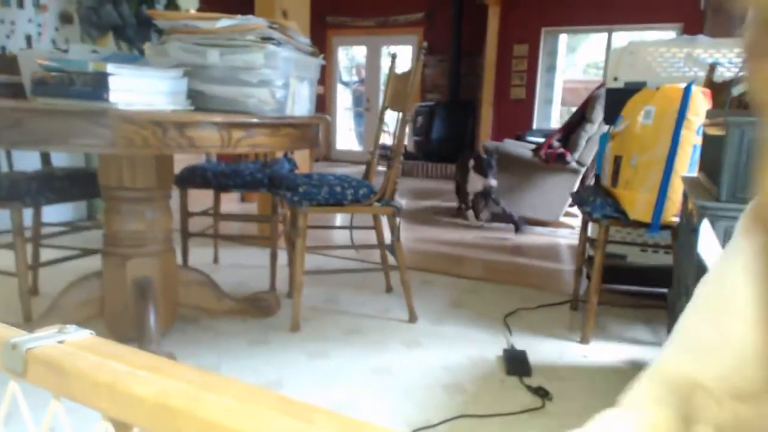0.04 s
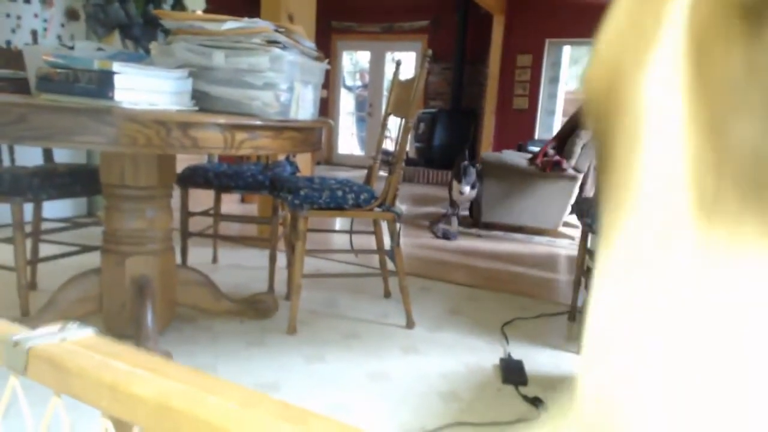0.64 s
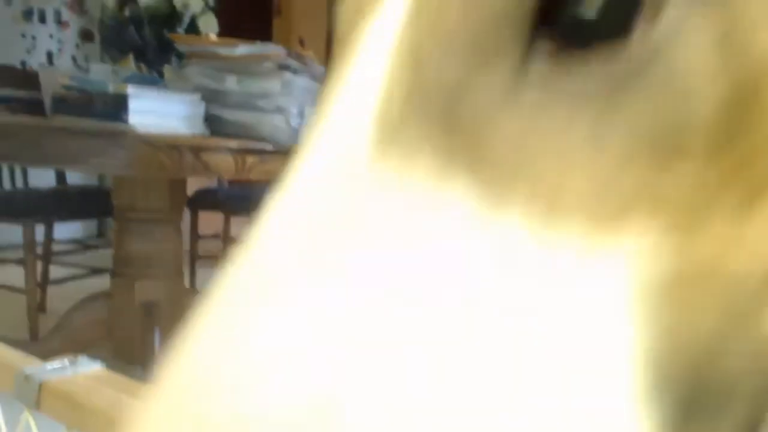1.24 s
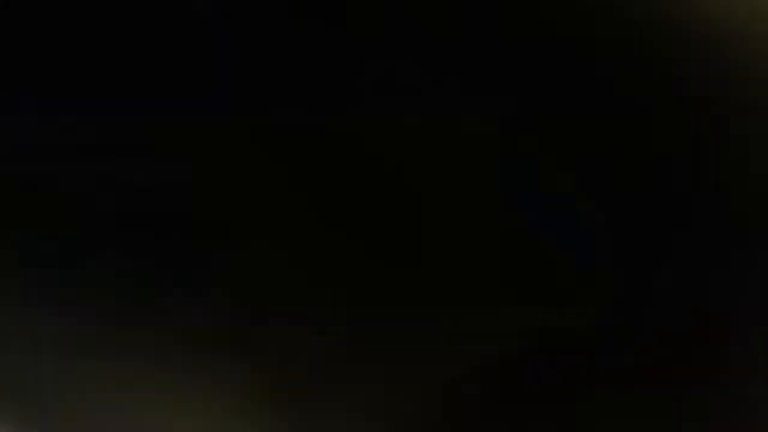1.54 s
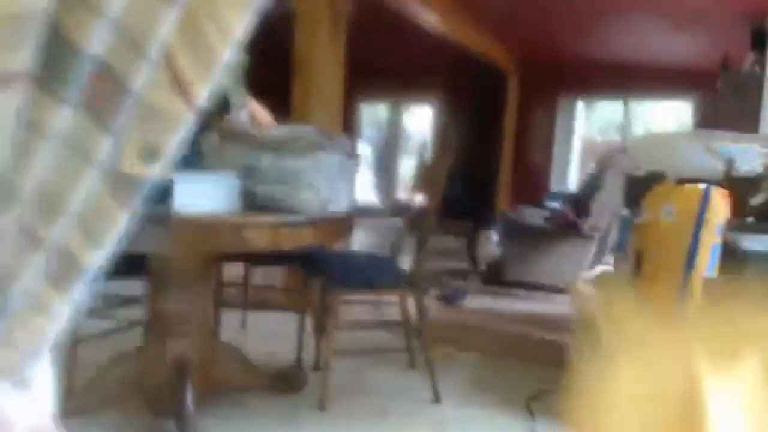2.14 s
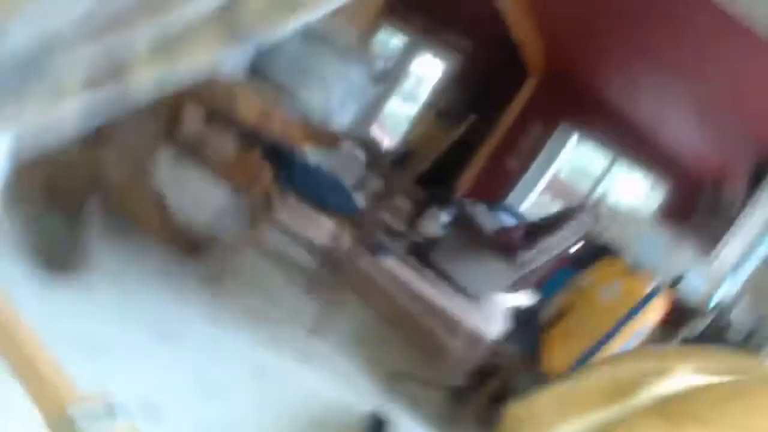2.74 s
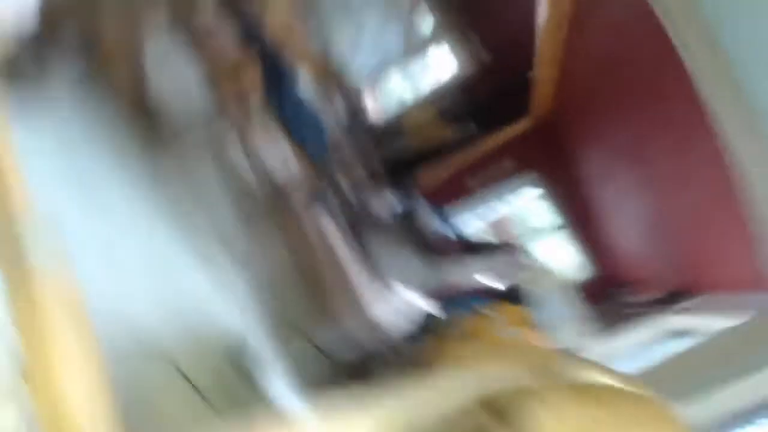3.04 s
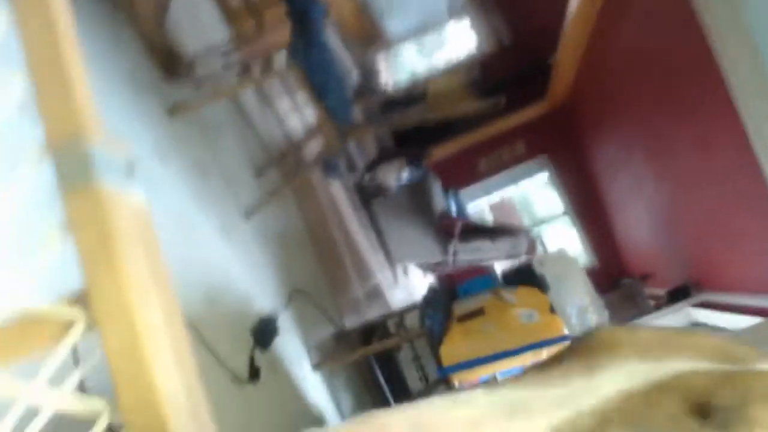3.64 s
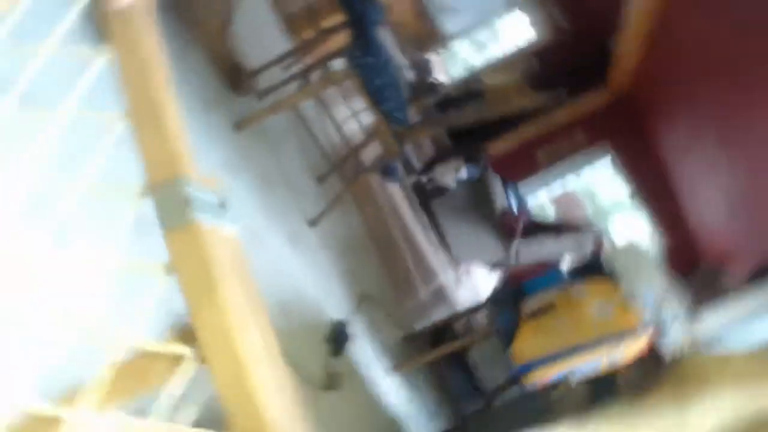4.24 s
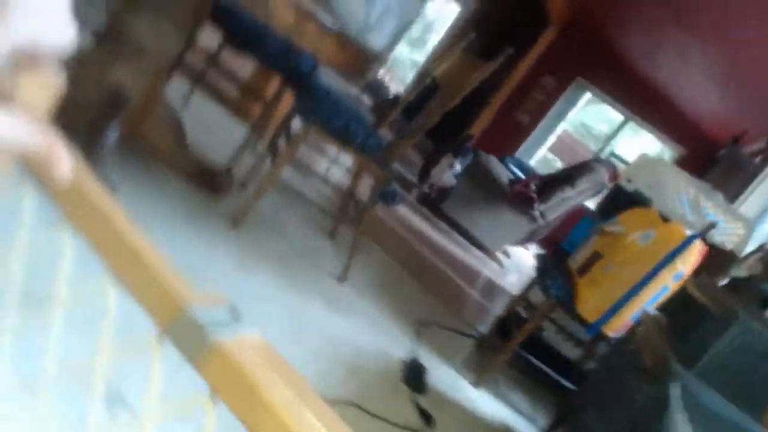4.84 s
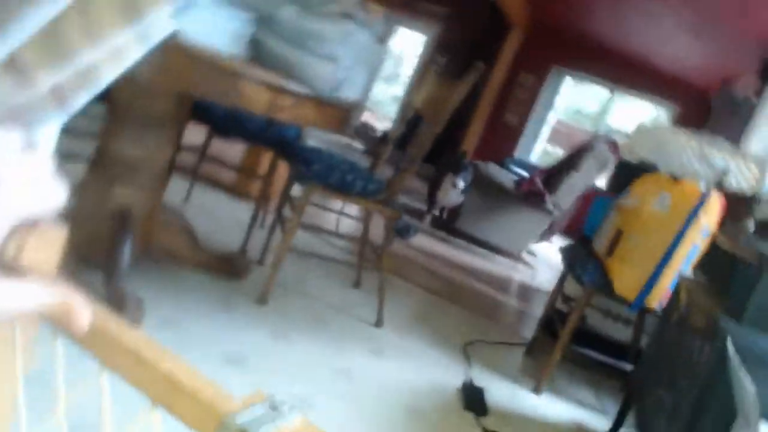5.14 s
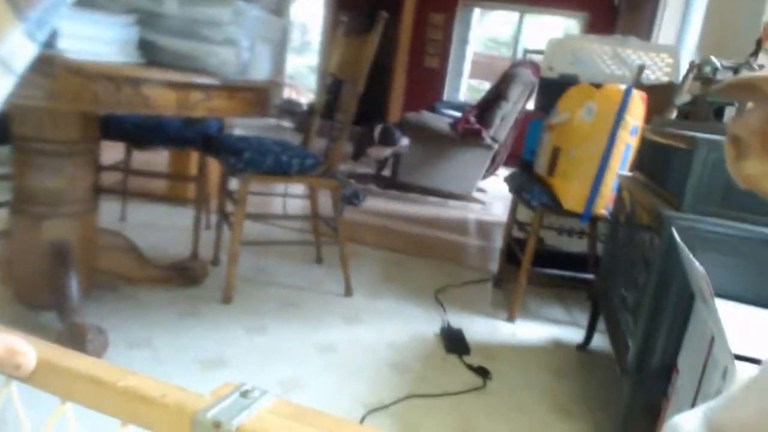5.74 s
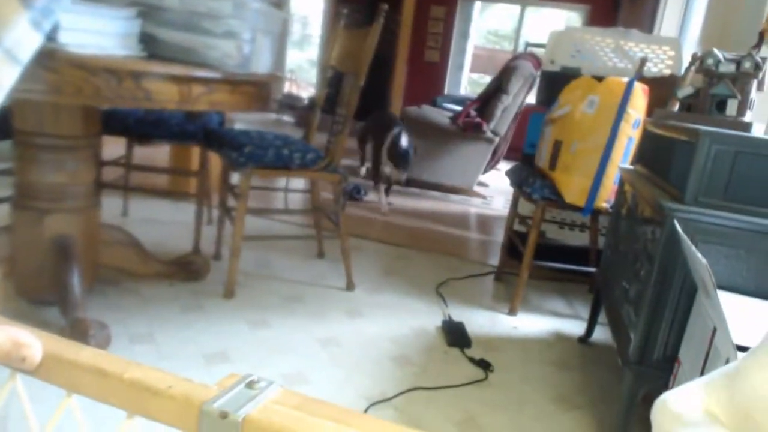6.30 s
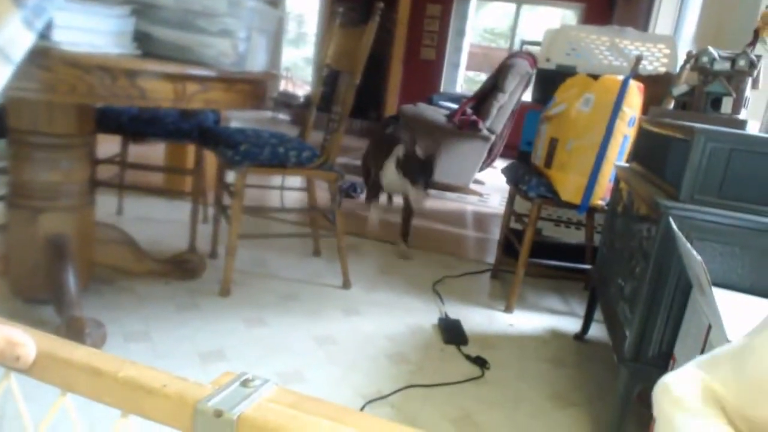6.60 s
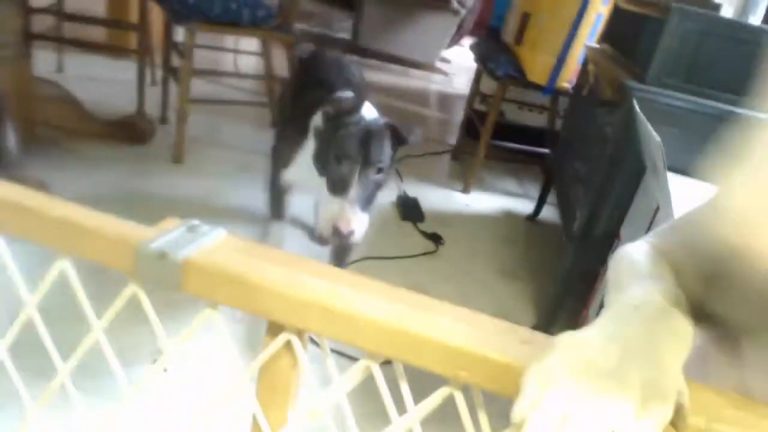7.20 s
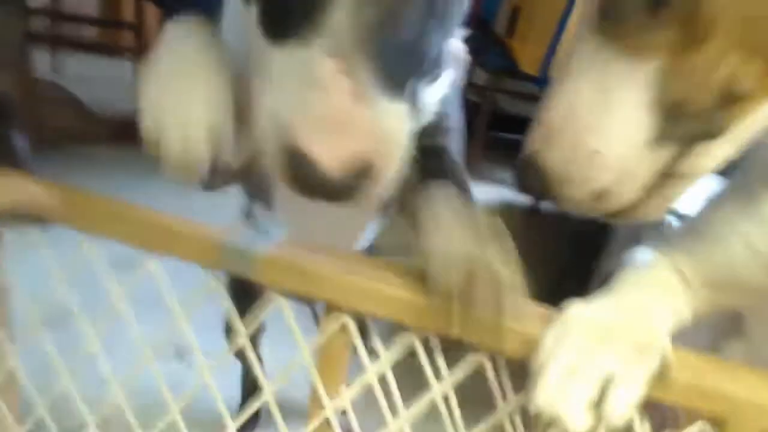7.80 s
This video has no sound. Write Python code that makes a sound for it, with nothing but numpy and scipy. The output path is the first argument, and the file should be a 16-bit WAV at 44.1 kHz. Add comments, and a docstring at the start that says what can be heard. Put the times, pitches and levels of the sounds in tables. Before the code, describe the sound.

Dogs' paws thud and claws click indoors, a muzzle rubs the microphone, and a wooden gate rattles over a steady hum.

```python
"""Dogs at a wooden pet gate in a living room: claws strike and ring the wood, paws thud and skid by
friction, and the gate rattles in its loose frame. One dog nuzzles the camera, exciting the resonances
of its shell, and the camera is then bumped and turned; another gallops up over the floor and skids to
the gate. An appliance hums throughout with mains harmonics and motor tones over a rush of air."""
import sys
import numpy as np
from scipy import signal
from scipy.fft import rfft, irfft, next_fast_len
from scipy.io import wavfile
from scipy.ndimage import uniform_filter1d, map_coordinates

SR = 44100
rng = np.random.default_rng(int(sys.argv[2]) if len(sys.argv) > 2 else 0)


def generate_wav(sig):
    """Save sig (samples, or channels by samples) to the path in sys.argv[1] as 16-bit PCM at SR."""
    pcm = np.round(np.clip(np.atleast_2d(sig).T, -1, 1) * 32767).astype(np.int16)
    wavfile.write(sys.argv[1], SR, pcm)


N = 346626
T = np.arange(SR * 3 // 4) / SR  # time axis of one short sound
STROKE_LEAD_S, SLIP_LEAD_S = T[len(T) // 3], T[len(T) // 10]  # where a stroke and a squeak peak on T


def amp(db):
    """Decibels to amplitude ratio."""
    return 10 ** (np.asarray(db) / 20)


def decay(t60):
    """Exponential damping: 60 dB down after t60 seconds."""
    return amp(-60 * T / t60)


def unit(x):
    """Normalisation to rms 1."""
    return x / np.sqrt(np.mean(x ** 2) + 1e-20)


def crest(x):
    """Normalisation of a stereo sound so that its loudest 5 ms have rms 1."""
    return x / np.sqrt(uniform_filter1d(np.mean(x ** 2, axis=0), size=220).max())


def along(points, hz):
    """Interpolation of (Hz, value) points on a logarithmic frequency axis."""
    knots, values = np.transpose(points)
    return np.interp(np.log(hz + 1), np.log(knots + 1), values)


def curve(rows):
    """Linear interpolation of (s, value) rows to one value per sample."""
    return np.interp(np.arange(N) / SR, *np.transpose(rows))


def wobble(rate):
    """Smooth random modulation with rate knots a second."""
    return map_coordinates(rng.standard_normal(int(N * rate / SR) + 4), [np.arange(N) * rate / SR])


def grit(depth, samples):
    """Log-normal amplitude modulation in grains about this many samples long."""
    return np.exp(depth * unit(uniform_filter1d(rng.standard_normal(len(T)), size=samples)))


def filtered(x, response):
    """Linear filtering: the spectrum of x times a complex frequency response."""
    n = x.shape[-1]
    size = next_fast_len(n + 2048, True)
    return irfft(rfft(x, size) * response(np.fft.rfftfreq(size, 1 / SR)), size)[..., :n]


def coloured(x, spectrum):
    """Spectral shaping by (Hz, dB) points."""
    return filtered(x, lambda hz: amp(along(spectrum, hz)))


def resonate(x, modes):
    """Modal superposition: x drives (Hz, width Hz, dB) resonances of alternating sign."""
    return filtered(x, lambda f: sum((-1) ** k * amp(db) * 1j * f * w / (hz * hz - f * f + 1j * f * w)
                                     for k, (hz, w, db) in enumerate(modes)))


def noise(size):
    """Spatial coherence: white noise at two microphones, alike in the bass, unrelated in the treble."""
    # Each row: frequency in Hz, side level over mid level in dB.
    width = [(60, -64.5), (150, -103), (350, -24), (600, -28.5), (1060, -7), (1900, 1), (6000, -0.5)]
    turn = lambda hz: np.arctan(amp(along(width, hz)))
    white = rng.standard_normal((2, size))
    mid, side = filtered(white, lambda hz: np.array([np.cos(turn(hz)), np.sin(turn(hz))]))
    return np.array([mid + side, mid - side])


def add(track, s, sound):
    """Superposition of a sound on the track from s seconds on."""
    start = round(s * SR)
    part = sound[:, max(-start, 0):N - start]
    track[:, max(start, 0):][:, :part.shape[1]] += part


def in_room(x, wet_db):
    """Reverberation: a short sound plus a tail in which each frequency dies at its own rate."""
    # Each row: frequency in Hz, reverberation time in seconds.
    room_t60 = [(100, 0.4), (500, 0.48), (2000, 0.46), (5000, 0.41), (10000, 0.36)]
    hz, t, spectra = signal.stft(noise(len(T)), SR, nperseg=256)
    damped = spectra * amp(-60 * t / along(room_t60, hz)[:, None])
    tail = signal.istft(damped, SR, nperseg=256)[1][:, :len(T)]
    reflections = grit(depth=0.45, samples=50)  # furniture and walls answer separately
    tail = tail * reflections * (1 - np.exp(-T / 0.00069))
    return x + amp(wet_db) * signal.fftconvolve(x, tail / np.linalg.norm(tail[0]), axes=1)[:, :len(T)]


def tone(hz, db, drift_rad):
    """A hum line with phase drift; shorter waves reach the two microphones more out of step."""
    apart = np.array([[1], [-1]]) * hz / 2200 * wobble(0.7)
    phase = 2 * np.pi * hz * np.arange(N) / SR + drift_rad * wobble(1.686) + apart
    return amp(db + wobble(0.57)) * np.sqrt(2) * np.sin(phase)


def appliance():
    """Mains harmonics form standing waves that the camera moves through; motor tones and air join in."""
    # Each row: time in seconds, rms levels of the first, second and third harmonic in dB.
    mains_levels = [(0, -38.5, -54, -54), (.7, -39, -44.5, -58), (2.6, -40.5, -50, -51),
                    (3.2, -41.5, -46.5, -54), (4.1, -40.5, -51, -48.5), (5.3, -40.5, -48.5, -48),
                    (7.86, -46, -71, -54.5)]
    # Each row: frequency of a motor tone in Hz, rms level in dB.
    motor_tones = [(203.9, -51.5), (320, -58), (489.9, -58.5), (666, -58)]
    # Each row: time in seconds, level of the rushing air in dB.
    air_levels = [(0, -35), (1.4, -40), (2.6, -38), (3.5, -40.5), (5.5, -40), (6.5, -38), (7.86, -36)]
    # Each row: frequency in Hz, gain of the rushing air in dB.
    air_spectrum = [(20, 4), (32, -25), (48, 2.5), (100, -4), (260, -2), (430, -6.5), (700, -8.5),
                    (1000, -11.5), (1400, -14), (1800, -21), (3200, -24.5), (5000, -31.5), (6500, -37.5),
                    (6900, -34), (7500, -45), (11000, -75)]
    hum_hz, levels = 120, np.array(mains_levels)
    mains = sum(tone(k * hum_hz, curve(levels[:, [0, k]]), drift_rad=0.2) for k in (1, 2, 3))
    motor = sum(tone(hz, db, drift_rad=1.0) for hz, db in motor_tones)
    air = amp(curve(air_levels) + 0.16 * wobble(2.9)) * unit(coloured(noise(N), air_spectrum))
    return mains + motor + air


def thud(hz, t60, knock_db, boom_db):
    """A soft impact excites one damped oscillation, the duller floor modes and a knock of contact."""
    # Each row: frequency in Hz, gain of the floor's boom in dB.
    boom_spectrum = [(25, -39), (60, -22), (90, 19.5), (190, 13.5), (300, 3.5), (600, -14), (1500, -81)]
    # Each row: frequency in Hz, gain of the knock in dB.
    knock_spectrum = [(100, -14), (300, 9.5), (700, 12.5), (1200, -2), (1800, -19), (4000, -5), (7000, -27),
                      (10000, -29)]
    envelope = decay(t60) * (1 - np.exp(-T / 0.0013))
    swing = np.cos(2 * np.pi * hz * T) * envelope
    boom = crest(coloured(noise(len(T)) * envelope, boom_spectrum))
    knock = crest(coloured(noise(len(T)) * decay(0.056), knock_spectrum))
    cushion = 1 - np.exp(-(T / 0.00079) ** 2)  # the pad takes a moment to compress
    return cushion * (swing / np.abs(swing).max() + amp(boom_db) * boom + amp(knock_db) * knock)


def paws():
    """Impact excitation of the floor: the toes land first, lighter and higher, then the pad."""
    # Each row: start in seconds, level in dB, pitch in Hz, relative slap level in dB.
    footfalls = [(0.04, -38, 233, -25), (0.05, -16.5, 183, -18.5), (0.078, -33, 209, -32),
                 (0.213, -25, 108, -28), (0.261, -29, 227, -18), (0.384, -25.5, 76.4, -27),
                 (1.112, -27.5, 89.5, -23), (1.151, -26.5, 70.6, -32), (1.226, -31, 73, -34),
                 (6.625, -14.5, 202.6, -12.5), (6.771, -26, 139, -6), (6.804, -25, 130, -16),
                 (6.918, -22.5, 235.6, -14), (7.001, -16.5, 132, -12), (7.153, -18, 142, -32),
                 (7.241, -11, 129, -29), (7.324, -10.5, 135, -41), (7.353, -22, 90, -26),
                 (7.465, -22, 186, -21), (7.487, -17, 96.5, -17), (7.567, -5, 97, -23),
                 (7.675, -7.5, 99.6, -30)]
    toe_lead_s, toe_db, toe_pitch_ratio, t60_s = 0.00995, -19, 1.894, 0.13
    out = np.zeros((2, N))
    for s, db, hz, slap_db in footfalls:
        toes = thud(toe_pitch_ratio * hz, t60_s, slap_db, boom_db=5)
        pad_t60 = t60_s * amp(-0.12 * db)  # faint paws linger in the boards
        pad = thud(hz, pad_t60, slap_db, boom_db=-8.5 + 0.079 * db)  # heavier paws boom more
        add(out, s - toe_lead_s, amp(db + toe_db) * toes)
        add(out, s, amp(db) * in_room(pad, wet_db=-7))
    return out


def tap():
    """An impulse: one clean contact that excites all modes and reaches both microphones at once."""
    return amp(23) * signal.unit_impulse(len(T))


def strike(click_db, wood_db, t60, ring_hz, body, room_db):
    """A hard impact and its chatter excite the wood's modes; the struck spot adds a brief, dry ring."""
    # Each row: frequency in Hz, gain of the click in dB.
    click_spectrum = [(900, -9.5), (1900, -19), (3000, -7.5), (4200, -5), (5200, -9.5), (6600, -13.5),
                      (7700, -26), (10500, -34.5)]
    ring_width_hz, ring_db, rise_s = 600, -7.5, 0.00019
    chatter = unit(grit(depth=0.6, samples=24))
    head_on = 0.5 * rng.standard_normal(len(T))  # reaches both microphones alike
    envelope = (chatter * decay(t60) + 0.5 * decay(0.019)) * (1 - np.exp(-T / rise_s))
    contact = (noise(len(T)) + head_on) * envelope
    click = amp(click_db) * crest(coloured(contact, click_spectrum))
    spot = amp(click_db + ring_db) * crest(resonate(contact, [(ring_hz, ring_width_hz, 0)]))
    # each spot wakes the wood's modes a little differently
    modes = [(hz * rng.normal(1, 0.014), width, db + rng.normal(0, 2)) for hz, width, db in body]
    wood = amp(wood_db) * crest(resonate(contact + tap(), modes))
    return in_room(click + wood, room_db) + spot


def claws():
    """Hard impacts of claws on floor and gate; the distant ones carry more reverberation."""
    # Each row: start in seconds, click level, wood level and relative room level in dB, ring in Hz.
    clicks = [(0.1319, -17, -39, -6, 5930), (0.1335, -20.5, -16.5, -24, 4200), (0.141, -32, -31, -12, 5500),
              (0.175, -25, -24.5, -1.5, 3350), (0.25, -24, -44, -2, 3640), (0.254, -29, -30, 0, 4000),
              (0.299, -41, -29.5, -20, 2130), (0.3569, -25.5, -45, 3, 3800), (0.5068, -24, -32.5, 5, 4600),
              (0.521, -24.5, -29.5, 0, 4700), (0.771, -40.5, -40, -9, 5230), (0.8062, -47, -39, -4, 4650),
              (0.8123, -32.5, -34, -13, 2560), (0.8982, -32.5, -35, -27, 4960),
              (.951, -35, -28.5, -3.5, 2090), (4.052, -46, -45, -1, 5160), (6.5685, -14.5, -40, -16, 4040),
              (6.578, -20, -54, 6, 4100), (6.6163, -22, -53, 5.5, 3900), (6.743, -29.5, -54, 3.5, 4400),
              (6.878, -38, -45, -6, 4450), (6.932, -29, -27, 1, 2290), (6.996, -37.5, -29, 5, 2270),
              (7.013, -43, -30, 0.5, 2600), (7.246, -30.5, -30.5, 0.5, 2820), (7.3398, -26, -28, -6, 2600),
              (7.508, -40.5, -39, 2, 2740), (7.583, -42, -44, 7, 2300), (7.6963, -28.5, -29.5, 0, 4700)]
    # Each row: frequency of a mode of gate and boards in Hz, bandwidth in Hz, gain in dB.
    wood_modes = [(270, 130, -21), (623, 290, 1), (874, 160, -2.5), (1090, 160, -0.5), (1375, 170, 1),
                  (1535, 140, -0.5), (1970, 270, -0.5), (2360, 130, 4.5), (2980, 470, -8)]
    chatter_t60_s = 0.038
    out = np.zeros((2, N))
    for s, click_db, wood_db, room_db, ring_hz in clicks:
        add(out, s, strike(click_db, wood_db, chatter_t60_s, ring_hz, wood_modes, room_db))
    return out * amp([[-0.8], [0.8]])


def stroke(swell, hold, fade, grain):
    """Friction noise swells, holds, then falls 60 dB in fade seconds; the grip catches unevenly."""
    t = T - STROKE_LEAD_S
    catch = grit(depth=grain, samples=60)
    envelope = np.exp(np.minimum(t, 0) / swell) * amp(-60 * np.maximum(t - hold, 0) / fade)
    return noise(len(T)) * catch * envelope


def scuffs():
    """Sliding friction: claws hiss and bite in short scratches while the pads drag on the boards."""
    # Each row: peak time in seconds, fade in seconds, hiss level in dB, drag level in dB.
    slides = [(0.231, 0.57, -44, -41), (1.109, 0.13, -48.5, -47), (1.202, 0.11, -42.5, -39.5),
              (1.44, 0.23, -53, -45.5), (1.69, 1, -53, -47.5), (2.801, 0.19, -49, -32),
              (3.778, 0.5, -78, -43), (3.979, 0.29, -54, -32.5), (6.754, 0.38, -34, -61),
              (6.898, 0.19, -30, -61), (7.05, 0.74, -49, -37), (7.357, 0.32, -40.5, -38.5),
              (7.583, 0.15, -36, -32.5), (7.83, 0.75, -33.5, -25.5)]
    # Each row: frequency in Hz, gain of the sliding claws in dB.
    hiss_spectrum = [(900, -23), (2000, -10.5), (3000, -5), (4200, -6), (5200, -9.5), (6600, -14),
                     (7700, -25.5), (10500, -34.5)]
    # Each row: frequency in Hz, gain of the dragging pads in dB.
    drag_spectrum = [(40, -22), (150, 2), (330, 8.5), (550, 7), (1000, 4.5), (1400, -0.5), (2200, -3),
                     (5000, -43.5)]
    bite_depth, bite_s = 0.31, 0.0096
    out = np.zeros((2, N))
    for s, fade, hiss_db, drag_db in slides:
        slide = stroke(swell=0.1 * fade, hold=0, fade=fade, grain=0.084)
        bites = np.exp(bite_depth * np.tanh(wobble(1 / bite_s)[:len(T)]))
        hiss = amp(hiss_db) * crest(coloured(bites * slide, hiss_spectrum))
        drag = amp(drag_db) * crest(coloured(slide, drag_spectrum))
        add(out, s - STROKE_LEAD_S, in_room(hiss + drag, wet_db=-10))
    return out


def slip_note(hz, rough, order, half):
    """Stick-slip oscillation with a scattered slip rate; a higher order flattens its envelope."""
    scatter = rough * unit(uniform_filter1d(rng.standard_normal((2, len(T))), size=20))
    phase = 2 * np.pi * np.cumsum(hz * (1 + scatter), axis=1) / SR
    envelope = np.exp(-np.abs((T - SLIP_LEAD_S) / half) ** order)
    return envelope * unit(np.sin(phase))


def claw_squeaks():
    """Stick-slip of a claw on the floor: each rough note falls as the paw slows down."""
    # Each row: centre in seconds, pitch in Hz, level in dB, half length in seconds, fall in Hz a second.
    squeaks = [(0.511, 4780, -26, 0.0056, 4950), (6.899, 4050, -26.5, .007, 49000),
               (6.928, 2866, -24, 0.0069, 20000)]
    out = np.zeros((2, N))
    for s, hz, db, half, fall in squeaks:
        note = slip_note(hz - fall * (T - SLIP_LEAD_S), rough=0.087, order=2, half=half)
        add(out, s - SLIP_LEAD_S, in_room(amp(db) * note, wet_db=-10))
    return out


def nuzzles():
    """Friction of a muzzle rings the camera shell, scratches over its ports and pushes air between them."""
    # Each row: time in seconds, level in dB, swell and hold in seconds, relative scratch and puff in dB.
    rubs = [(1.78, -33, 0.00074, 0.004, -6, 7), (1.816, -18, 0.017, 0, -5.5, -4.5),
            (1.8164, -18.5, 0.0015, 0.002, -21, 6), (1.833, -17.5, 0.0015, 0.0074, -12, -8),
            (1.845, -27, 0.004, 0.00024, -3.5, -17), (2.03, -34.5, 0.02, 0.0078, -5.5, -12),
            (2.0831, -10.5, 0.0017, 0.027, -4.5, -3), (2.1027, -8, 0.0011, 0, -3.5, 1.5),
            (2.147, -15, 0.00075, 0.0026, -10.5, -2.5), (2.319, -20, 0.00097, 0.000084, -0.5, 5.5),
            (2.388, -36, 0.015, 0, -6.5, 1), (2.464, -27.5, 0.0024, 0.000084, -3.5, -3),
            (3.151, -24.5, 0.0006, 0.0011, -29, 0.5), (5.118, -38, 0.0026, 0, -27, 2)]
    # Each row: frequency of a shell mode in Hz, bandwidth in Hz, gain in dB.
    shell_modes = [(820, 360, -3), (1152, 122, 11.5), (1370, 147, 10), (1550, 52, 10), (1920, 240, -14),
                   (2360, 69, -11.5)]
    # Each row: frequency in Hz, gain of the soft skin's drive in dB.
    skin_spectrum = [(1700, -2), (2300, 9.5), (3200, -19), (9000, -42)]
    # Each row: frequency in Hz, gain of the scratch in dB.
    scratch_spectrum = [(300, 9.5), (900, 0), (1900, -2), (2400, 2.5), (3600, -1), (4400, -8), (5400, -5),
                        (6800, -12), (8400, -32), (9200, -14), (10200, -26)]
    # Each row: frequency in Hz, gain of the air puff in dB.
    puff_spectrum = [(20, 0.5), (70, -4), (180, -4.5), (450, -10.5), (700, -7), (2000, -25), (6000, -49.5)]
    press_db_per_s, tap_tuning, stiffen_s = 596, 0.693, 0.0032
    alike = 0.6  # share of the rub that rings as one at both microphones
    out = np.zeros((2, N))
    for s, db, swell, hold, scratch_db, puff_db in rubs:
        fade = 0.0088 + 10.7 * swell  # a touch that comes on slowly also lets go slowly
        press = amp(press_db_per_s * np.clip(T - STROKE_LEAD_S, 0, hold))
        rub = stroke(swell, hold, fade, grain=0.16)
        # a brief tap rings lower; longer pressure stiffens the shell
        tuning = 1 - (1 - tap_tuning) * np.exp(-(swell + hold) / stiffen_s)
        modes = [(tuning * hz, width, gain) for hz, width, gain in shell_modes]
        drive = alike * rub.mean(axis=0) + (1 - alike) * rub + np.roll(tap(), len(T) // 3)
        ring = crest(resonate(coloured(drive, skin_spectrum), modes))
        scratch = amp(scratch_db) * crest(coloured(press * rub, scratch_spectrum))
        push = coloured(press * stroke(swell, hold, fade, grain=0.058), puff_spectrum)[0]
        sway = coloured(press * rub, puff_spectrum)[0]
        puff = amp(puff_db) * crest(np.array([3.2 * push + sway, 0.5 * push - 3.4 * sway]))
        add(out, s - STROKE_LEAD_S, amp(db) * in_room(ring + scratch + puff, wet_db=-24))
    return out * amp([[0.7], [-0.7]])


def nose_squeaks():
    """Stick-slip of the damp nose sustains one resonance of the shell that holds both microphones."""
    # Each row: centre in seconds, pitch in Hz, level in dB, half length in seconds, roughness from 0 to 1.
    squeaks = [(1.824, 1300, -15, 0.011, .22), (2.101, 1290, -10.5, 0.013, .2),
               (2.09, 5300, -30, 0.0066, .09)]
    rise_per_s = 4  # relative climb of pitch as the nose presses harder
    out = np.zeros((2, N))
    for s, hz, db, half, rough in squeaks:
        note = slip_note(hz * (1 + rise_per_s * (T - SLIP_LEAD_S)), rough, order=6, half=half)
        add(out, s - SLIP_LEAD_S, amp(db) * note[:1])
    return out


def bumps():
    """Structure-borne sound as the camera is turned: a few damped swings and a broad knock of the case."""
    # Each row: start in seconds, level in dB, relative knock level in dB.
    thumps = [(2.7797, -5.5, -8), (2.8, -25, -3), (2.833, -20.5, -12), (2.868, -25, -7.5),
              (3.021, -9.5, -16), (3.254, -17, -16), (5.636, -20, -26)]
    # Each row: frequency in Hz, gain of the case in dB.
    case_spectrum = [(100, -17), (350, 2.5), (520, 2), (750, -2), (1000, -9), (1350, -10.5), (1800, -28),
                     (4000, -33.5), (7000, -38.5), (10000, -51.5)]
    rise_s, swing_t60_s, case_t60_s = 0.0077, 0.028, 0.083
    out = np.zeros((2, N))
    for s, db, knock_db in thumps:
        hz = 218.6 + 3.5 * db  # a harder bump rings higher
        swing = np.sin(2 * np.pi * hz * T) * (1 - np.exp(-T / rise_s)) * decay(swing_t60_s)
        contact = noise(len(T)) * decay(case_t60_s) + tap()
        knock = crest(coloured(np.roll(contact, SR // 400, axis=1), case_spectrum))  # 2.5 ms late
        add(out, s, amp(db) * in_room(swing / np.abs(swing).max() + amp(knock_db) * knock, wet_db=-8))
    return out


def boards():
    """Resonance of a hollow board: a knocking or dragging paw draws one note from it."""
    # Each row: peak time in seconds, level in dB, pitch in Hz, swell and fade in seconds.
    notes = [(3.79, -39, 307, .06, 0.72), (4.0, -45, 440, 0.074, 0.27), (6.779, -32.5, 950, .004, 0.097),
             (7.152, -28, 623, 0.00066, 0.042), (7.362, -36, 730, .004, 0.064),
             (7.466, -32.5, 330, 0.0015, 0.21), (7.82, -27.5, 490, 0.023, 0.16)]
    width_hz = 88.5
    out = np.zeros((2, N))
    for s, db, hz, swell, fade in notes:
        note = crest(resonate(stroke(swell, 0, fade, grain=0.38), [(hz, width_hz, 0)]))
        add(out, s - STROKE_LEAD_S, amp(db) * in_room(note, wet_db=-12))
    return out


def gate_rattle():
    """Repeated impact: the loose wooden frame clacks to and fro, and every blow rebounds once."""
    # Each row: start in seconds, wood and click levels in dB, rebound delay in seconds,
    # relative rebound level in dB, ring in Hz.
    blows = [(5.8256, -34, -48, 0.0062, 1, 1900), (5.8867, -19, -27, 0.0076, -4.5, 2670),
             (5.9602, -17, -17.5, .0066, 3.5, 4570), (6.0432, -20, -24, 0.0047, -7, 2130),
             (6.121, -23, -33, .0058, 1, 1890), (6.2089, -21.5, -25.5, 0.0059, -1.5, 1720)]
    # Each row: frequency of a frame mode in Hz, bandwidth in Hz, gain in dB.
    frame_modes = [(365, 360, -4), (647, 83, 6), (875, 90, 6.5), (1230, 95, 8), (1395, 68, 4),
                   (1626, 170, 4.5), (1960, 260, 0.5), (2260, 150, 2.5), (2860, 300, -6)]
    chatter_t60_s = 0.052
    out = np.zeros((2, N))
    for s, wood_db, click_db, rebound_s, rebound_db, ring_hz in blows:
        for delay, db in [(0, 0), (rebound_s, rebound_db)]:
            clack = strike(click_db, wood_db, chatter_t60_s, ring_hz, frame_modes, room_db=-2)
            add(out, s + delay, amp(db) * clack)
    return out * amp([[-0.6], [0.6]])


def scene():
    """Superposition of all sources as heard from beside the gate."""
    clatter = claws() + gate_rattle()
    on_camera = nuzzles() + nose_squeaks() + bumps()
    on_floor = paws() + boards() + scuffs() + claw_squeaks()
    return clatter + on_camera + on_floor + appliance()


def record(dry):
    """Soft saturation and band limiting: the camera rounds off peaks and cuts the highest treble."""
    stop_hz, slope_width_hz = 11250, 400
    rounded = dry / (1 + np.abs(dry) ** 6) ** (1 / 6)
    return filtered(rounded, lambda hz: np.clip((stop_hz - hz) / slope_width_hz, 0, 1) ** 2)


dry = scene()
out = record(dry)
generate_wav(out)
```